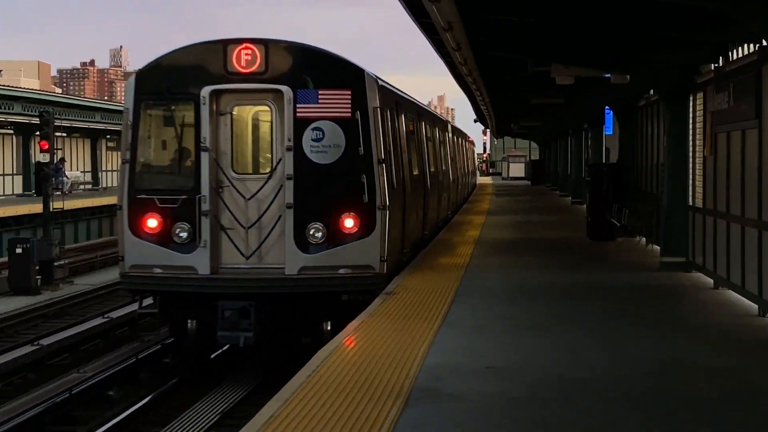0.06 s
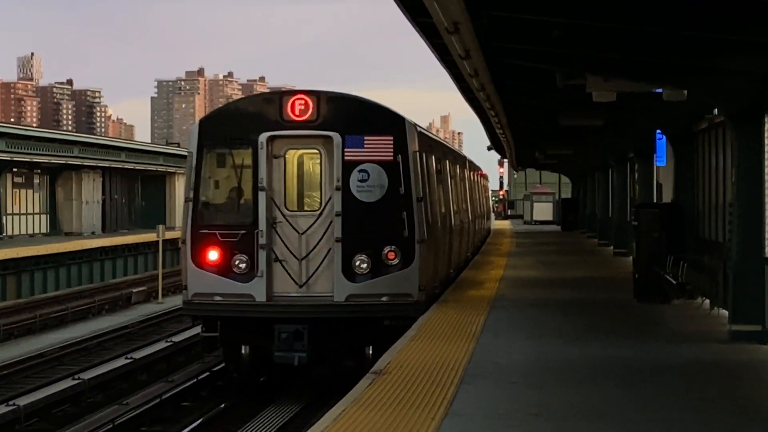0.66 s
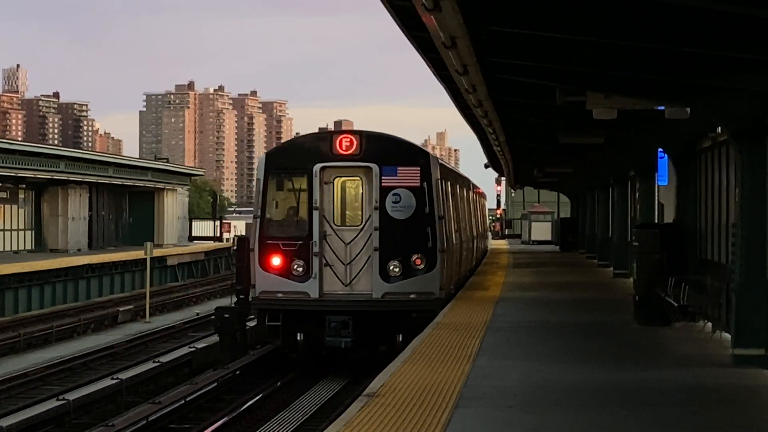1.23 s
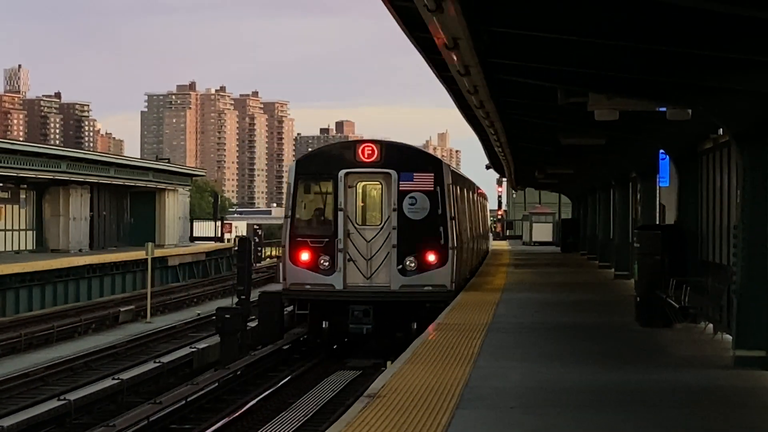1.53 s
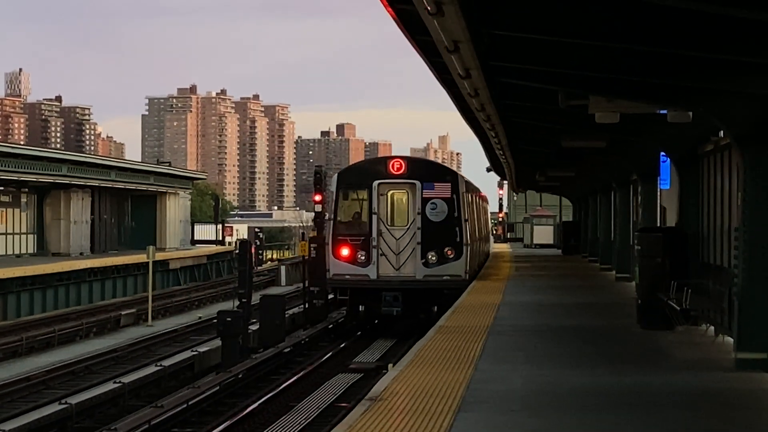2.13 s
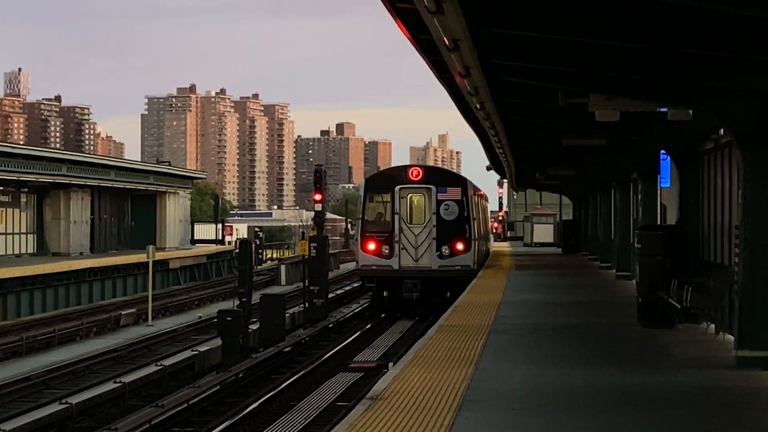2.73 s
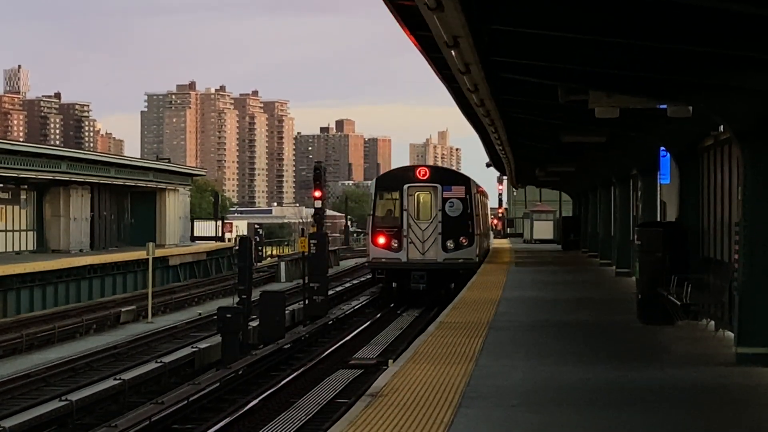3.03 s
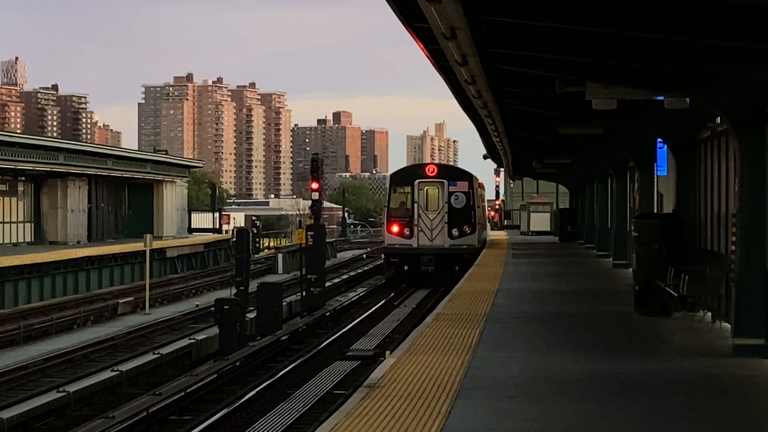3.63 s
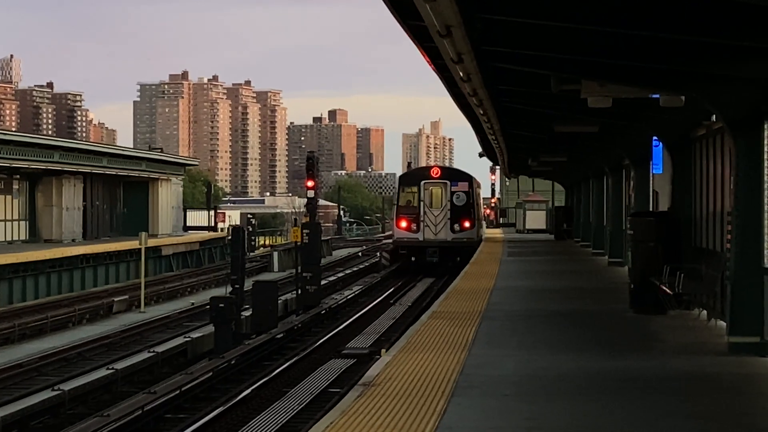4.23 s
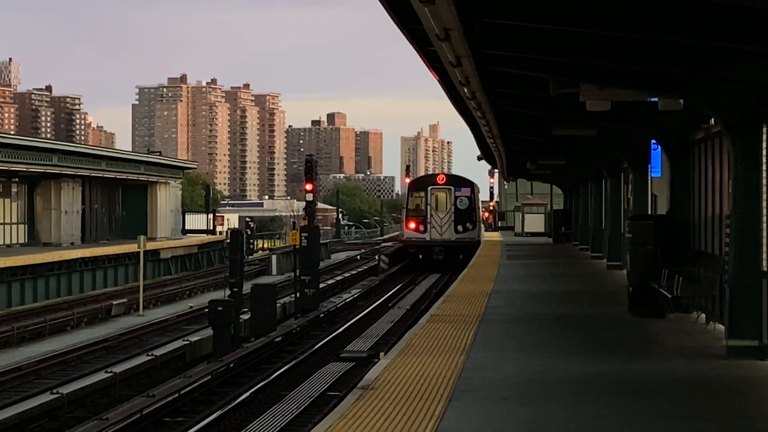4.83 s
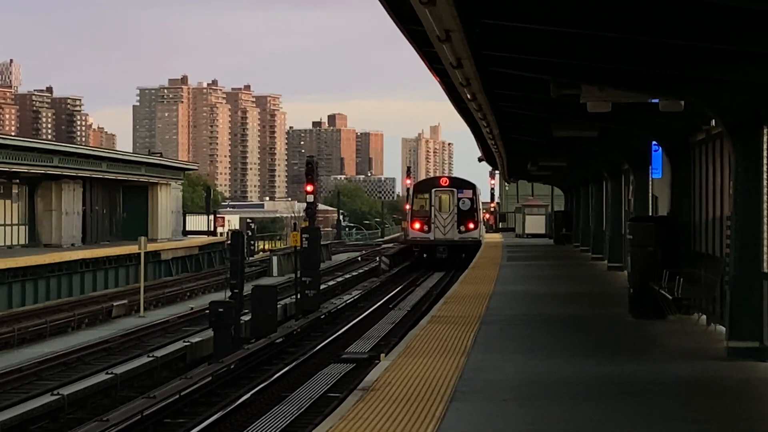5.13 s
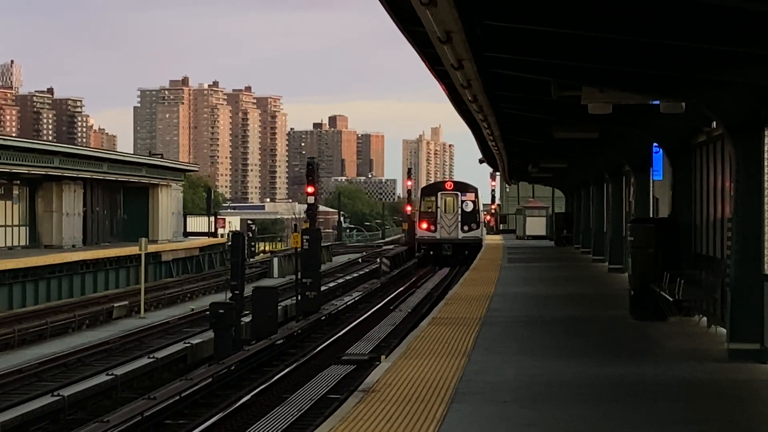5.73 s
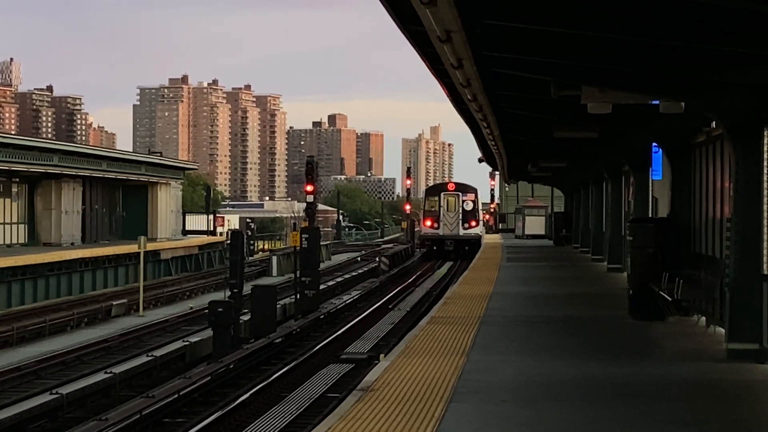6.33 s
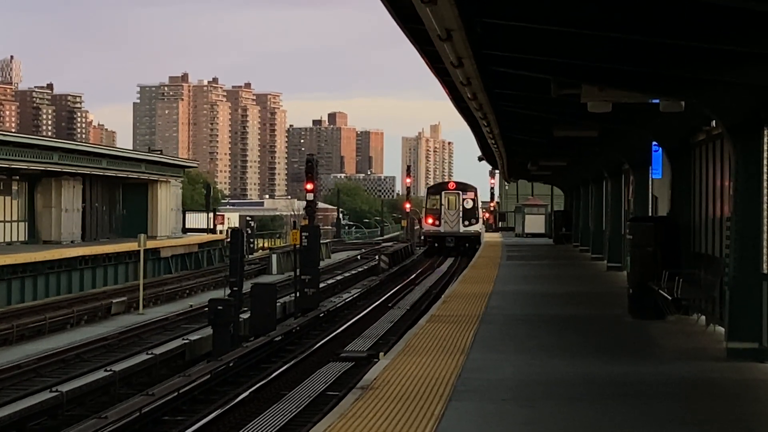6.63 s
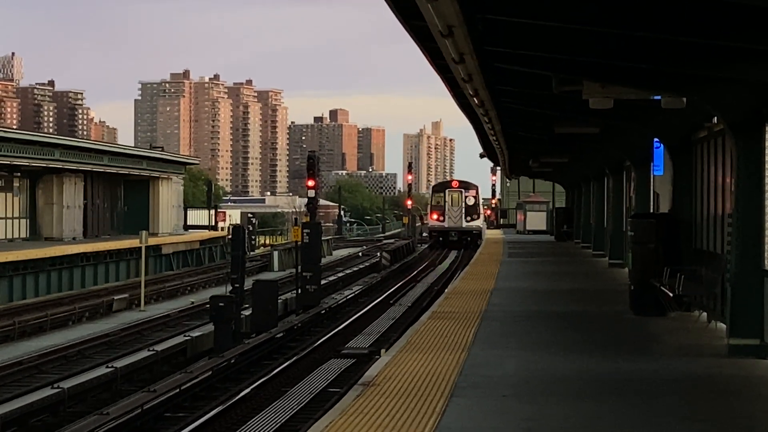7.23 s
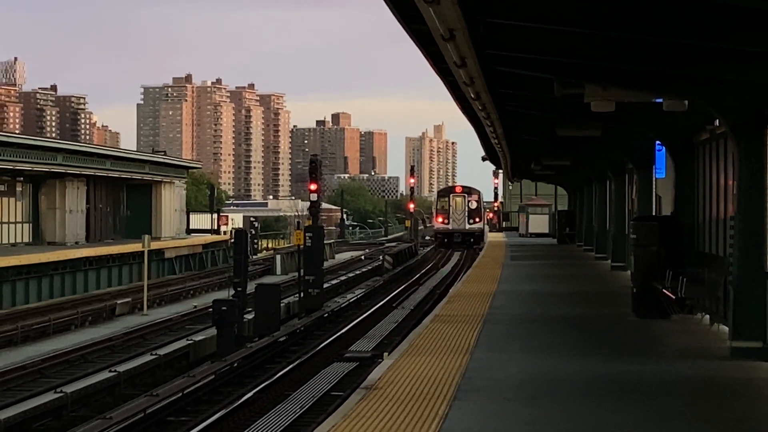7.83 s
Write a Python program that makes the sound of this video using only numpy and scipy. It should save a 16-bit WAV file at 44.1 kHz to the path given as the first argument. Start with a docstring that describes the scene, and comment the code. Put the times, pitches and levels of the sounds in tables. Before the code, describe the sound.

A subway train pulls away from an elevated platform with a deep, throbbing rumble and a hiss of steel wheels grinding on rails. Irregular clanks ring out at the rail joints, mixed with dull knocks and brief scrapes. Heard in stereo from the platform, it is close for about three seconds, then turns quieter and a little duller, still rolling and clicking at the end.

```python
"""A subway train pulls out of an elevated station and rolls away along the viaduct.
Its weight sets the steel deck rumbling, the girders booming and the car bodies roaring. The wheels
grind on rough rails, flanges scrape, bogies knock dully, and each rail joint gives a steel clank that
rings under the canopy. Heard from the platform on a small stereo microphone: close for the first
three seconds, then quieter and duller as the last car draws off."""
import sys
import numpy as np
from scipy import signal
from scipy.fft import rfft, irfft, next_fast_len
from scipy.io import wavfile
from scipy.ndimage import uniform_filter1d

SR = 44100
rng = np.random.default_rng(int(sys.argv[2]) if len(sys.argv) > 2 else 0)


def store_wav(level_fs):
    """Save 16-bit WAV to argv[1]."""
    pcm = np.round(np.clip(np.atleast_2d(level_fs), -1, 1) * 32767)
    wavfile.write(sys.argv[1], SR, pcm.T.astype(np.int16))


N = 351918
TIME = np.arange(N) / SR
EVENT_SAMPLES = SR * 2 // 3   # room for one blow or scrape and its tail
EVENT_TIME = TIME[:EVENT_SAMPLES]
FREQS = np.maximum(np.arange(N // 2 + 1) * SR / N, 1)
GRID_HZ = np.geomspace(10, SR / 2, 3000)

# The running train, from the platform. Each row: time in seconds, level in dB against the train close by.
RUNNING_LEVEL = [(0, -1), (0.49, -0.5), (0.78, 2.5), (1.08, 0.2), (1.6, 0), (1.93, 0.5), (2.3, -3.5),
                 (2.87, 0), (3.25, -7), (3.55, -4.5), (4.22, -8.5), (4.55, -7.5), (5.25, -9.5), (6.0, -9),
                 (6.65, -11), (7.25, -8), (7.6, -9.5), (7.98, -9.5)]
# Rail hiss, sagging between bogies. Each row: time in seconds, level in dB against the train close by.
HISS_LEVEL = [(0, -0.5), (0.4, -1.5), (0.53, -2), (0.72, 2.5), (1.05, 0.2), (1.55, 0), (1.71, 0),
              (1.9, 0.3), (2.14, -3), (2.6, -2), (2.88, 0.5), (3.1, -4.5), (3.26, -9), (3.52, -4.5),
              (3.74, -8.5), (3.9, -6.5), (4.1, -8.5), (4.23, -11.5), (4.5, -6), (4.73, -9.5), (4.92, -8.5),
              (5.25, -10.5), (5.5, -9), (5.68, -9.5), (6.1, -9.5), (6.55, -9), (6.97, -9.5), (7.3, -7.5),
              (7.65, -10.5), (7.98, -9.5)]
# The deck heaves under a passing axle. Each row: crest time in seconds, level in dB.
DECK_HEAVES = [(0.105, -14), (0.22, -17.5), (0.39, -18), (0.52, -15), (0.615, -14.3), (0.725, -14),
               (0.795, -15.5), (0.9, -14.5), (1.32, -20), (1.57, -14.5), (1.66, -26), (1.76, -17),
               (1.935, -13), (2.08, -17.5), (2.27, -18.5), (2.39, -18.5), (2.68, -19), (2.81, -17.5),
               (2.95, -22), (3.57, -23), (3.8, -26), (4.32, -24.5), (4.58, -20.5), (4.71, -22.5),
               (5.13, -26), (5.31, -23.3), (5.5, -26), (5.73, -21), (5.98, -26), (6.185, -25.5),
               (7.26, -25.5), (7.86, -24)]
# Girders boom and car bodies drum along. Each row: crest time in seconds, girder dB, car body dB.
GIRDER_BOOMS = [(0.46, -33.5, -32), (2.67, -25, -24.5), (3.57, -42, -33), (4.55, -27, -35.5),
                (4.68, -28.5, -48)]
# Flanges rub the rail head. Each row: start in seconds, nominal length in seconds, level in dB,
# rubbed wheel mode in Hz.
FLANGE_SCRAPES = [(0.189, 0.057, -40, 2880), (0.34, 0.12, -39, 3450), (0.552, 0.068, -38.5, 2880),
                  (1.744, 0.089, -36.5, 3420), (2.645, 0.11, -37, 2900), (2.82, 0.063, -44, 4400),
                  (3.556, 0.065, -42.5, 2870), (3.874, 0.047, -47, 2900), (4.324, 0.12, -44.5, 4400),
                  (4.488, 0.11, -42.5, 3330)]
# Bogies knock against their frames. Each row: start in seconds, level in dB, frame ring in Hz,
# attack in seconds.
BOGIE_KNOCKS = [(0.32, -24, 520, 0.017), (0.45, -29, 590, 0.0089), (0.56, -20, 537, .006),
                (0.666, -28, 1100, .003), (0.751, -15.5, 405, 0.0028), (0.849, -19, 1080, 0.0023),
                (1.226, -33, 860, .004), (2.482, -20, 874, 0.015), (2.657, -18, 770, 0.017),
                (2.795, -28, 940, 0.007), (2.98, -23.5, 870, 0.012), (3.43, -31, 600, .008),
                (4.07, -30, 520, .008), (4.51, -28.5, 475, 0.0072), (5.005, -29.5, 420, 0.0034),
                (5.82, -36, 600, .005), (5.97, -33, 950, .005), (7.22, -36, 770, .006),
                (7.38, -33, 680, .005)]
# Wheels cross rail joints. Each row: start in seconds, level in dB, brightness in dB per octave,
# the wheel's loudest mode in Hz, that mode's level in dB.
RAIL_JOINTS = [(0.6642, -22, 1.5, 3360, -33), (0.753, -27.5, 4.5, 3480, -38), (0.847, -19.5, 2, 3150, -32),
               (1.226, -29.5, 1.5, 3140, -40), (1.401, -27.5, -2, 2650, -40),
               (1.822, -28.5, -1.5, 3480, -42), (1.923, -27, 1.5, 4730, -42), (1.95, -29, 3.5, 2640, -42),
               (2.297, -32, 1.8, 3530, -44), (2.522, -30.5, -2.5, 3500, -48), (2.659, -28.5, -4, 1895, -33),
               (2.785, -31.5, 4, 2620, -40), (2.808, -28, -3, 1210, -40), (2.961, -22.5, 2, 4370, -38),
               (3.407, -36.5, 0, 3160, -50), (3.572, -38, -5, 3140, -49), (3.986, -33.5, -2.5, 1940, -37),
               (4.55, -41, -5, 3370, -42.5), (4.814, -33.5, -0.5, 2640, -53), (4.982, -29, 0.7, 2780, -39),
               (5.364, -39.5, 0.5, 3140, -53), (5.523, -37, -1, 1844, -39), (5.806, -36, -2, 1860, -44),
               (5.97, -34.5, 0, 1900, -47), (6.335, -39.5, -4, 1900, -50), (6.499, -41, -2, 1860, -45),
               (6.78, -35.5, 0.8, 4560, -48), (7.045, -41.5, 3, 3300, -51), (7.2, -32.5, 1.5, 3100, -42.5),
               (7.375, -36, -0.5, 2640, -48)]
# How far off the last car is. Each row: time in seconds, distance from 0 (near) to 1 (far).
DISTANCE = [(0, 0), (2.9, 0), (3.3, .55), (5, .6), (6.2, .95), (7.98, 1)]

# The tone of each source at close range. Each row: frequency in Hz, relative level in dB.
DECK_SPECTRUM = [(20, -45), (30, -30), (40, -13), (50, -5), (61, -0.5), (71, -4), (82, -9.5), (100, -37)]
GIRDER_SPECTRUM = [(58, 4), (78, -3), (90, 6), (106, 0.5), (122, 0.5), (145, -10), (200, -11), (240, -29)]
CAR_BODY_SPECTRUM = [(85, -28), (115, -4), (138, 2.5), (200, .5), (235, -3), (300, -1.5), (400, -6),
                     (520, -16), (800, -27.5)]
ROLLING_SPECTRUM = [(300, -25), (500, 2.5), (680, -1.5), (830, -0.5), (1050, -6), (1400, -7.5), (1800, -16),
                    (2600, -20.5)]
GRIND_SPECTRUM = [(900, -14), (1600, 1.5), (1880, 3.5), (2150, 2), (2700, 3), (3400, -0.5), (3700, -2.5),
                  (4700, -6.5), (5300, -8), (6900, -12), (8200, -23.5), (12000, -25), (14500, -35)]
KNOCK_SPECTRUM = [(80, -6), (220, -2), (350, 7.5), (600, 4.5), (850, 2), (1300, -5.5), (2200, -14),
                  (5000, -25)]
CLANK_SPECTRUM = [(300, -12), (800, 10.5), (1300, 14), (2200, 3), (3200, 5.5), (4700, -1), (5400, -2.5),
                  (7000, -6.5), (8300, -15.5), (12000, -18), (15000, -31)]
# Resonances of wheel and rail. Each row: frequency in Hz, width in Hz, lift in dB at full strength.
STEEL_MODES = [(1290, 130, -3), (1910, 140, 7.5), (2730, 240, 5.5), (3170, 130, 3), (3400, 120, 6),
               (3970, 110, 6.5), (4380, 170, 7.5), (4740, 170, 10), (6380, 220, 3)]
# What the air does to the far train. Each row: frequency in Hz, gain in dB.
AIR_GAIN = [(1500, 1), (3200, 0.5), (6500, -1.5), (8500, -6), (11000, -8.5), (14000, -8)]
# Stereo width at the microphone. Each row: frequency in Hz, side minus mid in dB.
MIC_WIDTH = [(60, -26.5), (130, -21), (290, -12), (620, -9.5), (1360, -5), (2900, -13.5), (4500, -13.5),
             (6500, -6), (8500, 8.5), (13000, -11)]
# Balance at the microphone. Each row: frequency in Hz, left minus right in dB.
MIC_BALANCE = [(60, 1.05), (200, 1), (370, 0.5), (680, -2.5), (1250, -2.5), (2300, 1.5), (4200, 0),
               (7700, 0.5)]


def from_db(db):
    """Decibels to gain."""
    return 10 ** (np.asarray(db) / 20)


def unit_rms(x):
    """Scale to unit power."""
    return x / np.sqrt(np.mean(x ** 2) + 1e-20)


def in_time(points):
    """A curve read at every sample."""
    return np.interp(TIME, *np.transpose(points))


def at_hz(points, hz, beyond=None):
    """A spectrum in dB, read on a log-frequency axis."""
    freqs, db = np.transpose(points)
    return np.interp(np.log(hz), np.log(freqs), db, left=beyond, right=beyond)


def source_db(points, hz):
    """A source spectrum, silent outside its range."""
    return at_hz(points, hz, beyond=-90)


def tilt_db(hz, db_per_octave):
    """A harder contact is brighter, up to a limit set by the size of the contact patch."""
    return db_per_octave * np.log2(np.minimum(hz, 5500))


def peak(hz, centre_hz, width_hz):
    """The outline of one resonance, 1 on top."""
    return 1 / (1 + (2 * (hz - centre_hz) / width_hz) ** 2)


def steel_db(hz, strengths):
    """The lift from the wheel and rail modes, each at its own strength."""
    return sum(k * db * peak(hz, centre, width) for k, (centre, width, db) in zip(strengths, STEEL_MODES))


def drift(per_s):
    """A random wander of rms 1, with per_s new values a second."""
    knots = rng.standard_normal(int(N / SR * 200) + 2)
    return unit_rms(np.interp(TIME * per_s, np.arange(len(knots)), knots))


def noise(colour, size=N, grain_db=0):
    """Unrelated mid and side noises, coloured by a function from Hz to dB; grain_db roughens them."""
    padded = next_fast_len(size, True)
    gain = np.interp(np.arange(padded // 2 + 1) * SR / padded, GRID_HZ, from_db(colour(GRID_HZ)))
    white = rng.standard_normal((2, padded))
    if grain_db:
        white = np.sign(white) * from_db(grain_db * np.minimum(rng.exponential(1, padded), 4))
    return unit_rms(irfft(rfft(white) * gain, padded)[:, :size])


def rumble(spectrum, window_s):
    """Low noise with its chance swells evened out, so that the load sets its level."""
    raw = noise(lambda hz: source_db(spectrum, hz))
    power = uniform_filter1d(raw[0] ** 2, int(window_s * SR))
    return unit_rms(raw / np.sqrt(power + 0.071))


def swells(crests, rise_s, fall_s):
    """A smooth hump at each crest time; one gain curve for each level column."""
    times, *levels = np.transpose(crests)
    coarse = TIME[::40]
    ramps = np.array([np.interp(coarse, [s - rise_s, s, s + fall_s], [0, 1, 0]) for s in times])
    humps = np.sin(np.pi / 2 * ramps)
    return [np.interp(TIME, coarse, np.sqrt(from_db(db) ** 2 @ humps ** 2)) for db in levels]


def blow(attack_s, t60_s, canopy_db, canopy_t60_s):
    """The envelope of a blow: a quick rise, the ring of the metal, the canopy's reverberation."""
    metal = from_db(-60 * EVENT_TIME / t60_s)
    canopy = from_db(canopy_db - 60 * EVENT_TIME / canopy_t60_s)
    return (1 - np.exp(-EVENT_TIME / attack_s)) * np.hypot(metal, canopy)


def add(out, start_s, sound):
    """Mix a sound in at its time."""
    at = int(start_s * SR)
    out[:, at:at + sound.shape[1]] += sound[:, :N - at]


def viaduct_rumble():
    """The moving weight shakes deck, girders and car bodies; each swells above its running level."""
    running_db = in_time(RUNNING_LEVEL)
    heaving, = swells(DECK_HEAVES, rise_s=0.051, fall_s=0.047)
    booming, drumming = swells(GIRDER_BOOMS, rise_s=0.18, fall_s=0.16)
    deck = rumble(DECK_SPECTRUM, window_s=0.033)
    girders = rumble(GIRDER_SPECTRUM, window_s=0.12)
    bodies = rumble(CAR_BODY_SPECTRUM, window_s=0.19)
    throb_db = 2.5 * drift(per_s=16)
    # Each layer has its close-up level in dB and follows its own share of the train's fading.
    return (deck * np.hypot(from_db(-25 + 0.85 * running_db + throb_db), heaving)
            + girders * np.hypot(from_db(-29 + 0.39 * running_db), booming)
            + bodies * np.hypot(from_db(-24 + 1.02 * running_db), drumming))


def rolling_wheels():
    """Rail roughness gives a rolling roar and a fluttering hiss in which the steel rings faintly."""
    hiss_db = in_time(HISS_LEVEL)
    flutter = drift(per_s=24)
    roar = noise(lambda hz: source_db(ROLLING_SPECTRUM, hz))
    grind = noise(lambda hz: source_db(GRIND_SPECTRUM, hz) + steel_db(hz, [0.27] * len(STEEL_MODES)))
    roar_db = -32 + 0.8 * hiss_db + 0.98 * flutter
    grind_db = -36.5 + 0.97 * hiss_db + 0.66 * flutter + 0.41 * drift(per_s=88)
    return roar * from_db(roar_db) + grind * from_db(grind_db)


def flange_scrapes():
    """A flange leans on the rail and grates, brighter than plain rolling, stirring one wheel mode."""
    out = np.zeros((2, N))
    for start_s, length_s, db, mode_hz in FLANGE_SCRAPES:
        pressure = np.interp(EVENT_TIME, length_s * np.array([0, .15, .8, 1.4]), [0, 1, 1, 0])
        grate = noise(lambda hz: source_db(GRIND_SPECTRUM, hz) + tilt_db(hz, 2.8)
                      + 6 * peak(hz, mode_hz, width_hz=110), EVENT_SAMPLES)
        add(out, start_s, from_db(db) * pressure * grate)
    slip_db = 0.8 * drift(per_s=260)
    return out * from_db(slip_db)


def bogie_knocks():
    """The heavy bogie knocks low and hollow, each frame with a ring of its own."""
    out = np.zeros((2, N))
    for start_s, db, ring_hz, attack_s in BOGIE_KNOCKS:
        knock = noise(lambda hz: source_db(KNOCK_SPECTRUM, hz) + 7.5 * peak(hz, ring_hz, width_hz=120),
                      EVENT_SAMPLES)
        knock *= blow(attack_s, t60_s=0.22, canopy_db=-29, canopy_t60_s=0.6)
        add(out, start_s, from_db(db) * knock)
    return out


def wheel_ring(mode_hz):
    """A wheel mode and its weaker, close partner beat as they die away."""
    phases = rng.uniform(0, 2 * np.pi, (2, 2, 1))
    partner_hz = mode_hz + rng.uniform(-85, 75)
    lead = np.sin(2 * np.pi * mode_hz * EVENT_TIME + phases[0])
    partner = 0.75 * np.sin(2 * np.pi * partner_hz * EVENT_TIME + phases[1])
    return (lead + partner) * blow(attack_s=0.0036, t60_s=0.19, canopy_db=-20, canopy_t60_s=0.7)


def joint_clanks():
    """A wheel drops over a joint: a bright crack, a dense steel clank and one mode ringing on."""
    out = np.zeros((2, N))
    hard_hit_db = -22.5   # below this the crack falls away faster than the clank
    for start_s, db, brightness, mode_hz, mode_db in RAIL_JOINTS:
        strengths = rng.uniform(.3, 1.1, len(STEEL_MODES))
        wear = 1 + 0.012 * rng.uniform(-1, 1)   # uneven wear shifts each wheel's modes
        clank = noise(lambda hz: source_db(CLANK_SPECTRUM, hz) + tilt_db(hz, brightness)
                      + steel_db(hz * wear, strengths), EVENT_SAMPLES, grain_db=4)
        clank *= blow(attack_s=0.0037, t60_s=0.19, canopy_db=-8.5, canopy_t60_s=0.59)
        crack = noise(lambda hz: source_db(CLANK_SPECTRUM, hz) + tilt_db(hz, brightness + 3.1),
                      EVENT_SAMPLES, grain_db=9)   # a burst of uneven contacts
        crack *= blow(attack_s=0.0024, t60_s=0.023, canopy_db=-40, canopy_t60_s=0.4)
        crack_db = db + 6.5 - 0.57 * max(hard_hit_db - db, 0)
        add(out, start_s, from_db(db) * clank)
        add(out, start_s, from_db(crack_db) * crack)
        add(out, start_s, from_db(mode_db) * wheel_ring(mode_hz))
    return out


def draw_off(near):
    """The treble fades as the last car draws away from the microphone."""
    distance = in_time(DISTANCE)
    far = irfft(rfft(near) * from_db(at_hz(AIR_GAIN, FREQS)), N)
    return (1 - distance) * near + distance * far


def scene():
    """On the platform the bass arrives alike on both sides; reflections spread the midrange."""
    steel = draw_off(rolling_wheels() + flange_scrapes() + joint_clanks())
    edge_fade = np.minimum(1, np.minimum(TIME, TIME[::-1]) / .004)
    mid, side = rfft(edge_fade * (viaduct_rumble() + steel + bogie_knocks()))
    side *= from_db(at_hz(MIC_WIDTH, FREQS))
    balance = from_db(at_hz(MIC_BALANCE, FREQS) / 2)
    return irfft(np.array([(mid + side) * balance, (mid - side) / balance]), N)


def record(dry):
    """The small stereo microphone: a hollow near 9 kHz in the centre of the image, and the top cut."""
    hollow = signal.butter(3, [8200, 9900], "bandstop", fs=SR, output="sos")
    top_cut = signal.ellip(10, .1, 90, 14600, fs=SR, output="sos")
    mid = signal.sosfilt(hollow, (dry[0] + dry[1]) / 2)
    side = (dry[0] - dry[1]) / 2
    return signal.sosfilt(top_cut, np.array([mid + side, mid - side]))


dry = scene()
out = record(dry)
store_wav(out)
```